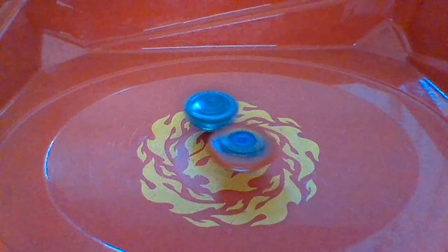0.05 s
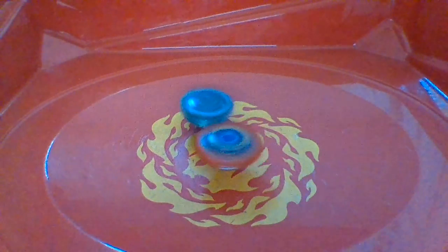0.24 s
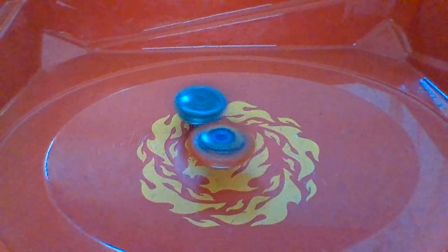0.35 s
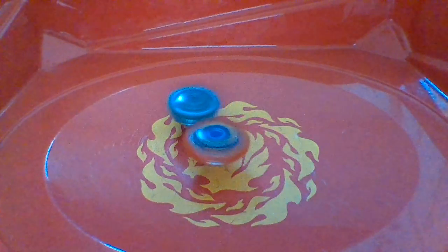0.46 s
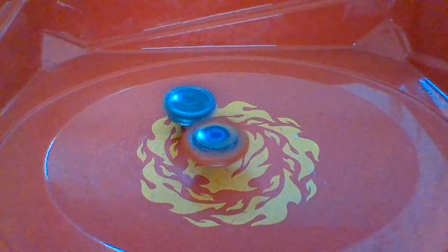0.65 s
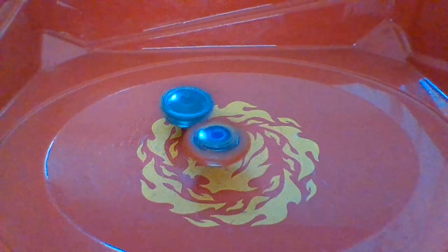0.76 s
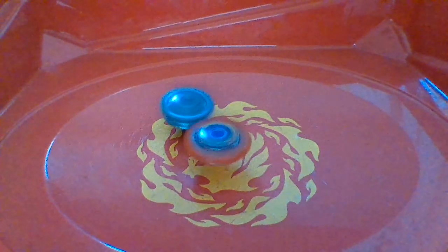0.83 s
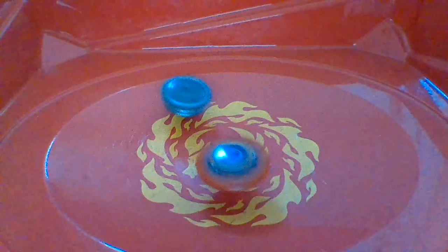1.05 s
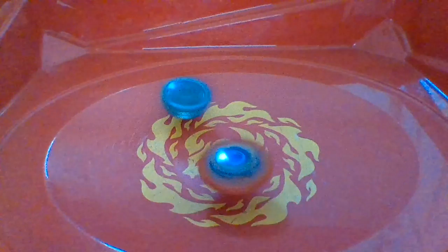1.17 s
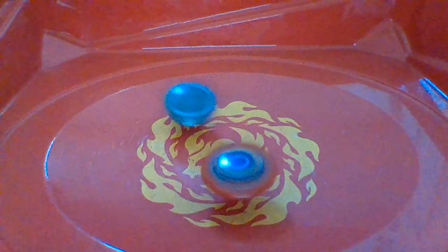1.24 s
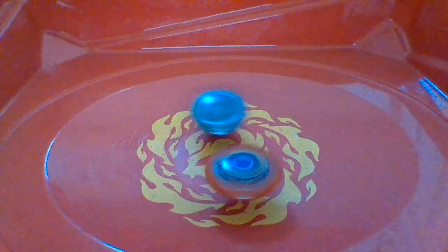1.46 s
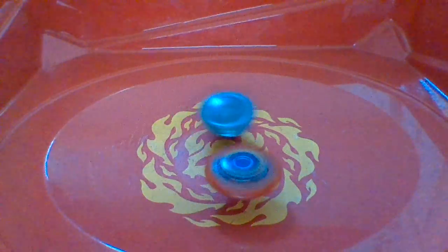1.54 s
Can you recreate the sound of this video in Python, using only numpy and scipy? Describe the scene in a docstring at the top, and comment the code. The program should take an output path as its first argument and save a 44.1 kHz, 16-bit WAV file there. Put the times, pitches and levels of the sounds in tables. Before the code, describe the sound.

Spinning tops clack together in a plastic bowl, then one ticks and scrapes away.

```python
"""Spinning tops clashing in a plastic bowl

Two tops clash four times in a hollow bowl, close to a small microphone that clips. Each clash is a
clack, a noisy ring-out, a thin metal ring and a boom of the bowl. Then a top wanders off, its tip
ticking once a turn and droning the bowl floor, over a faint low hum."""
import sys
import numpy as np
from scipy import signal
from scipy.fft import rfft, irfft
from scipy.io import wavfile
from scipy.ndimage import uniform_filter1d

SR = 44100
rng = np.random.default_rng(int(sys.argv[2]) if len(sys.argv) > 2 else 0)


def log_audio(samples):
    """Write samples as a 16-bit WAV file to the path given in sys.argv[1]."""
    # one column per channel
    frames = np.atleast_2d(samples).T
    # limit to full scale, then quantise
    limited = np.clip(frames, -1, 1)
    pcm = np.round(limited * 32767).astype(np.int16)
    wavfile.write(sys.argv[1], SR, pcm)


N = 70560
T = np.arange(N) / SR
HZ = np.fft.rfftfreq(N, 1 / SR) + 1

# what each clash sets ringing (time [s], level [dB], rise [s], t60 [s], tilt [dB/octave],
# metal ring [dB], bowl boom [dB], hollow ring [dB])
CLASHES = [(.224, -20.5, .004, 0.22, -1, -25, -36.5, -53), (0.579, -22.5, 0.0023, 0.2, -1, -60, -30, -43),
           (0.623, -20.5, 0.00466, 0.19, -1, -36, -40, -66),
           (0.9135, -11.5, 0.0071, 0.22, 0.5, -37.5, -30.5, -32.5)]
# faders of the wandering top (time [s], scrape [dB], drone [dB], rumble [dB])
ROLL_LEVELS = [(1.2, -90, -80, -89), (1.236, -58.5, -73, -64), (1.266, -57.5, -54, -52),
               (1.312, -55, -64, -49.5), (1.338, -54, -39.5, -49), (1.402, -50.5, -36, -46),
               (1.439, -66, -44.5, -55), (1.522, -72.5, -64.5, -62.5), (1.6, -70, -84, -69)]


def amp(db):
    return 10 ** (np.asarray(db) / 20)


def noise(shape):
    """Noise of unit rms with the given gain per frequency."""
    x = irfft(rfft(rng.standard_normal(N)) * shape, N)
    return x / np.std(x)


def noise_band(shape, colour):
    """One band of a coloured noise, at its share of the whole power."""
    return noise(shape) * np.sqrt(np.mean(shape ** 2) / np.mean(colour ** 2))


def eq_curve(points):
    """Gain per frequency through (frequency [Hz], level [dB]) points."""
    hz, db = np.array(points).T
    return amp(np.interp(np.log(HZ), np.log(hz), db))


def bumps(peaks):
    """Gain per frequency of resonances (frequency [Hz], width [Hz], level [dB])."""
    return sum(amp(db) / np.hypot(1, 2 * (HZ - hz) / width) for hz, width, db in peaks)


def fade(start, t60, rise=1e-4, hold=0.):
    """Attack, hold, exponential release."""
    t = np.maximum(T - start, 0)
    return (1 - np.exp(-(t / rise) ** 2)) * amp(-60 * np.maximum(t - hold, 0) / t60)


def fader(table, column):
    """Gain over time from a column of dB points, closed before the first."""
    points = np.array(table)
    return amp(np.interp(T, points[:, 0], points[:, column], left=-120))


def modes(x, table):
    """Damped resonators struck by x."""
    out = 0
    for hz, db, t60 in table:
        pole = np.exp(2j * np.pi * hz / SR - np.log(1000) / (t60 * SR))
        out = out + amp(db) * signal.lfilter([1], [1, -pole], x).imag
    return out


def drift(rate_hz):
    """Smooth random modulation of unit rms."""
    return noise(1 / (1 + (HZ / rate_hz) ** 4))


def dense_modes(width_hz=27, spread_db=2):
    """Gain per frequency of the countless narrow resonances of tops and bowl."""
    ripple = uniform_filter1d(rng.standard_normal(len(HZ)), int(width_hz / (HZ[1] - HZ[0])))
    return amp(spread_db * ripple / np.std(ripple))


def room_tone(level_db=-65):
    """Octave bands of a quiet room, each coming and going on its own."""
    # room spectrum (frequency [Hz], level [dB])
    room_eq = [(80, -10.5), (130, -20.5), (220, -28), (500, -35), (1120, -32.5), (2880, -40), (6350, -44.5),
               (17500, -37)]
    colour = eq_curve(room_eq) * (HZ > 75)
    centres = 100 * 2. ** np.arange(8)
    bands = [colour * np.cos(np.pi / 2 * np.clip(np.log2(HZ / hz), -1, 1)) for hz in centres]
    return sum(noise_band(band, colour) * amp(level_db + 1.2 * drift(5)) for band in bands)


def hum():
    """A narrow band of low noise, heard as a wavering hum."""
    # hum fader (time [s], level [dB])
    levels = [(0, -69), (0.102, -58.5), (0.601, -68.5), (1.202, -71), (1.399, -59), (1.6, -56)]
    return fader(levels, 1) * noise(bumps([(52, 16, 0)]) ** 2)


def spinning(spin_hz=43.3):
    """Faint air noise pulses once a turn, and the bowl murmurs under the tips."""
    air = noise(bumps([(11800, 3900, 0.0072), (4060, 230, 0.047)]) ** 2)
    whirr = np.cos(np.pi * spin_hz * T) ** 4 * air * amp(-74 + 1.5 * drift(10))
    murmur = sum(amp(-80 + 4 * drift(4)) * noise(bumps([(hz, 35, 0)]) ** 2) for hz in (390, 565, 1110))
    return whirr + murmur


def rolling(drone_hz=129):
    """The wandering tip scrapes, rumbles and drones the bowl floor at three bumps a turn."""
    # scrape spectrum (frequency [Hz], level [dB])
    scrape_eq = [(1500, -38.5), (2100, -13), (2950, -11), (4280, -10.5), (7940, -17.5), (11500, -19.5),
                 (13000, -14.5), (17500, -29)]
    # rumble resonances (frequency [Hz], width [Hz], level [dB])
    rumble_peaks = [(217.6, 190, 0), (457, 130, -3), (573, 50, -6.5), (1408, 170, -3.5)]
    # a ring of the bowl that steps up as the top wanders (time [s], pitch [Hz], level [dB])
    ring_path = [(1.23, 1001, -65.5), (1.381, 1017, -47.5), (1.429, 1136, -58.5), (1.6, 1143, -61)]
    scrape = fader(ROLL_LEVELS, 1) * amp(2.7 * drift(110)) * noise(eq_curve(scrape_eq))
    drone_phase = 2 * np.pi * np.cumsum(drone_hz * (1 + drift(3.2) / 50)) / SR
    drone = fader(ROLL_LEVELS, 2) * np.sqrt(2) * np.sin(drone_phase)
    rumble = fader(ROLL_LEVELS, 3) * amp(2.5 * drift(25)) * noise(bumps(rumble_peaks) ** 2)
    times, pitches, _ = np.array(ring_path).T
    ring_phase = 2 * np.pi * np.cumsum(np.interp(T, times, pitches)) / SR
    ring = fader(ring_path, 2) * drift(55) * np.sin(ring_phase)
    return scrape + drone + rumble + ring


def tip_ticks():
    """The tip ticks once a turn; the rub between ticks follows the scrape."""
    # taps of the tip (time [s], level [dB])
    ticks = [(1.1019, -38), (1.1238, -34.5), (1.1499, -34.5), (1.2185, -43), (1.2393, -37.5), (1.2614, -30),
             (1.285, -30), (1.309, -36), (1.3316, -26.5), (1.3534, -28), (1.3783, -29.5), (1.3992, -30),
             (1.4224, -47), (1.471, -45.5), (1.4956, -43.5), (1.5648, -41), (1.5892, -50.5)]
    # tip resonances (frequency [Hz], level [dB], t60 [s])
    tip_modes = [(2410, -5, 0.041), (3510, -18.5, 0.06), (2765, -1, 0.034), (2947, 0.5, 0.022),
                 (4335, -2.5, 0.023), (5130, -10, 0.03), (6060, -12.5, 0.12)]
    taps = sum(amp(db - 3.5) * fade(s - .001, t60=.015, rise=.0014) for s, db in ticks)
    rub = amp(.5) * fader(ROLL_LEVELS, 1)
    grit = noise(bumps([(3900, 3200, 0)]) ** 2) / 20
    return modes((taps + rub) * grit, tip_modes)


def bright_clicks():
    """The other top clicks in short bursts of high treble."""
    # clicks (time [s], level [dB])
    clicks = [(1.254, -40), (1.275, -34), (1.298, -38), (1.345, -36), (1.5452, -41), (1.569, -40)]
    bursts = sum(amp(db) * fade(s, t60=.01, rise=.0014) for s, db in clicks)
    return bursts * noise(bumps([(9200, 1500, -1), (13000, 5400, -2)]) ** 2)


def bowl_boom(t60=.13, hold=.051):
    """Each clash swells into a low boom and a hollow ring of the bowl."""
    # low bowl resonances (frequency [Hz], level [dB], t60 [s])
    boom_modes = [(112, 0, .09), (185, -5, .07), (280, -9, .05)]
    # hollow midrange resonances (frequency [Hz], level [dB], t60 [s])
    hollow_modes = [(1260, -6, 0.11), (1256, -8, 0.051), (1660, -1, 0.048), (547.6, -11.5, 0.11)]
    boom = sum(amp(db) * fade(s, t60, rise=.036, hold=hold) for s, *_, db, _ in CLASHES)
    hollow = sum(amp(db) * fade(s, t60, rise=.016, hold=hold) for s, *_, db in CLASHES)
    low_noise = noise(bumps([(151, 360, 0)]) * (HZ > 85)) / 100
    return modes(boom * low_noise, boom_modes) + modes(hollow * rng.standard_normal(N) / 10, hollow_modes)


def metal_ring():
    """Each clash strikes a thin ring from three close, beating partials."""
    # metal partials (frequency [Hz], level [dB], t60 [s])
    partials = [(6322.5, 0, .42), (6228.5, -14, .42), (6133.5, -9, .42)]
    strikes = np.zeros(N)
    for s, *_, metal_db, _, _ in CLASHES:
        strikes[int(s * SR)] = amp(metal_db)
    return modes(strikes, partials)


def ring_out(flicker_db=2, peaks_db=-9.5):
    """Bowl and room sound on in half-octave bands; narrow resonances of the tops outlast them."""
    # tail spectrum (frequency [Hz], level [dB])
    tail_eq = [(88, -38), (150, -2.5), (554, -4), (677, -14), (1210, -1), (1540, -13), (2820, 2.5),
               (3660, -4.5), (6180, 2), (8020, -5), (12500, 3), (17200, -12.5)]
    # resonances of the tops (frequency [Hz])
    top_peaks = [2918, 4030, 4870, 6460, 9280, 10140, 11700, 13150]
    colour = eq_curve(tail_eq) * dense_modes()
    tail = 0
    for hz in 180 * 2 ** np.arange(0, 7, .5):
        band = colour * np.cos(np.pi * np.clip(np.log2(HZ / hz), -.5, .5))
        octaves = np.log2(hz / 4000)
        hold = .002 * max(-octaves, 0)  # the lows hold longer
        stretch = (hz / 2000) ** .062 * (.92 if hz > 7000 else 1)
        envelope = sum(amp(db + tilt * octaves) * fade(s, t60 * stretch, rise, hold)
                       for s, db, rise, t60, tilt, *_ in CLASHES)
        tail = tail + envelope * amp(flicker_db * drift(140)) * noise_band(band, colour)
    peaks = bumps([(hz, 180, 0) for hz in top_peaks]) ** 2
    for stretch, band in ((1.217, HZ < 8000), (1, HZ >= 8000)):
        envelope = sum(amp(db) * fade(s, t60 * stretch, rise) for s, db, rise, t60, *_ in CLASHES)
        tail = tail + amp(peaks_db) * envelope * noise(peaks * band)
    return tail


def clacks(knock_gain_db=-39.5):
    """Rims grind for a few milliseconds: a broad crack and a knock of the plastic."""
    # rim contacts (time [s], level [dB], hold [s], t60 [s], knock offset [dB])
    contacts = [(0.2166, -1, .003, 0.012, -10), (0.2212, -2, .0045, 0.024, 2),
                (0.5651, -2, .002, 0.023, 0.5), (0.6133, 1.5, .003, 0.016, 0.5),
                (0.8837, -6, .001, .02, 1.5), (0.8877, -2, .005, 0.011, -2.5),
                (0.904, -17, .005, 0.0082, 8)]
    # crack spectrum (frequency [Hz], level [dB])
    crack_eq = [(88, -45.5), (150, -35.5), (3490, -7.5), (4010, -5.5), (6600, -4), (8050, -12),
                (8720, -3.5), (12500, 0.5), (17500, -13)]
    # plastic resonances (frequency [Hz], level [dB], t60 [s])
    knock_modes = [(1199.5, -1, 0.031), (1429, -4.5, 0.044), (2327, 2, 0.027), (4047, 2, 0.039)]
    grind = sum(amp(db) * fade(s, t60, hold=hold) for s, db, hold, t60, _ in contacts)
    blows = sum(amp(db + offset) * fade(s, t60, hold=hold) for s, db, hold, t60, offset in contacts)
    crack = grind * noise(eq_curve(crack_eq) * dense_modes())
    return crack + amp(knock_gain_db) * modes(blows * rng.standard_normal(N), knock_modes)


def mic_thump(start=.8885, pitch_hz=100, swoop_hz=425, swoop_s=.002):
    """The hardest blow rocks the microphone: a thump that swoops down to its pitch."""
    t = np.maximum(T - start, 0)
    cycles = pitch_hz * t + swoop_hz * swoop_s * (1 - np.exp(-t / swoop_s))
    return -amp(-5) * fade(start, t60=.032, hold=.005) * np.sin(2 * np.pi * cycles)


def scene():
    """Mono mix; all but the thump drops out briefly around the hardest blows."""
    # drop-outs (time [s], length [s], depth [dB])
    dropouts = [(.6065, .0045, -20), (.8955, .0095, -60)]
    dip_db = sum(db * np.exp(-((T - s - length / 2) / (length / 2)) ** 4) for s, length, db in dropouts)
    bed = room_tone() + hum() + spinning()
    wandering = rolling() + tip_ticks() + bright_clicks()
    clashes = bowl_boom() + metal_ring() + ring_out() + clacks()
    return ((bed + wandering + clashes) * amp(dip_db) + mic_thump())[None]


def record(dry, ceiling=.84, cutoff_hz=17400):
    """The small microphone clips the clacks; a steep low-pass cuts the highest treble."""
    lowpass = signal.cheby1(9, .3, cutoff_hz, fs=SR, output="sos")
    return signal.sosfilt(lowpass, np.clip(dry, -ceiling, ceiling))


dry = scene()
out = record(dry)
log_audio(out)
```